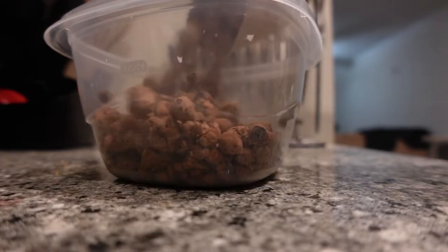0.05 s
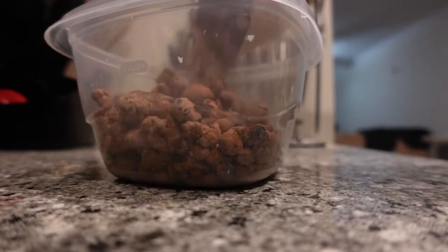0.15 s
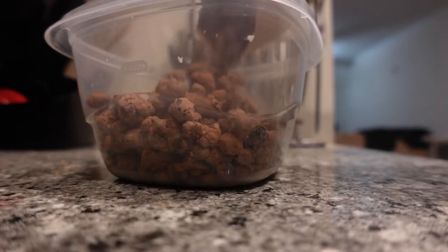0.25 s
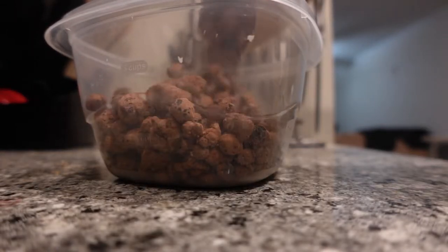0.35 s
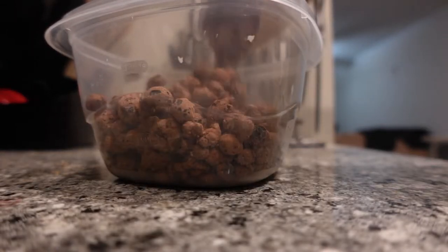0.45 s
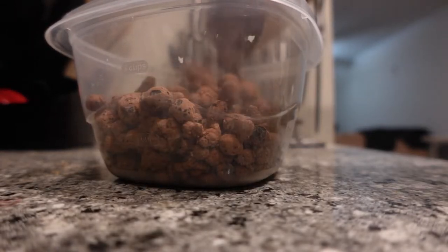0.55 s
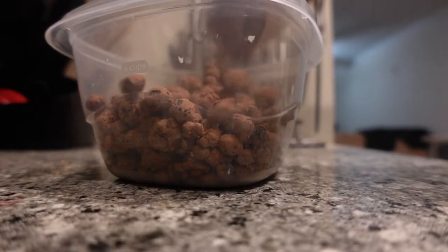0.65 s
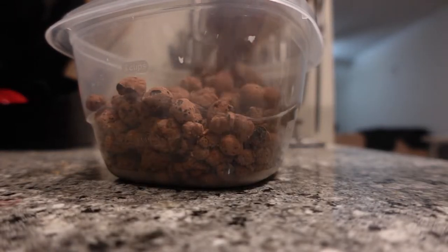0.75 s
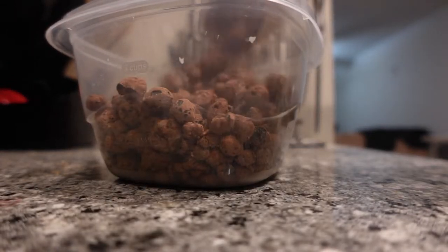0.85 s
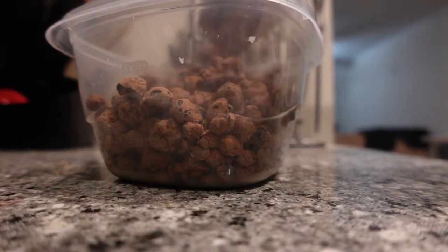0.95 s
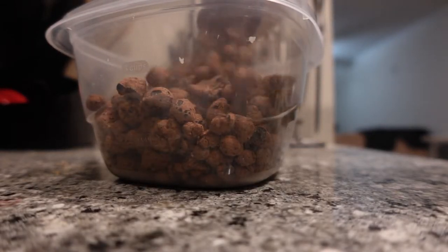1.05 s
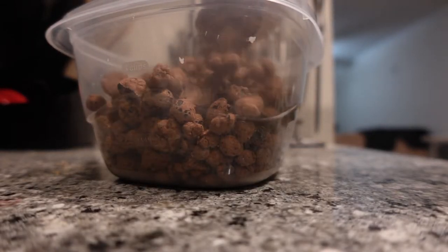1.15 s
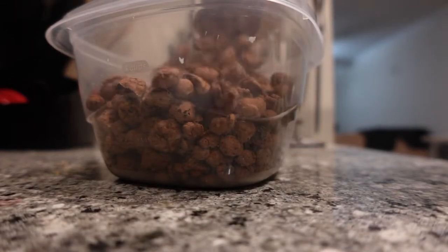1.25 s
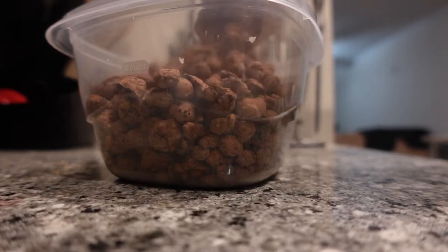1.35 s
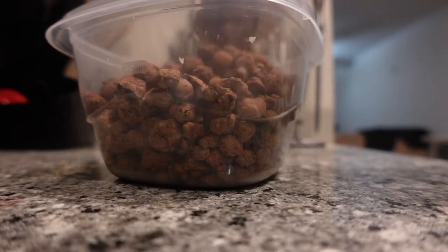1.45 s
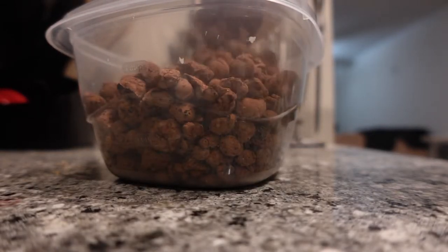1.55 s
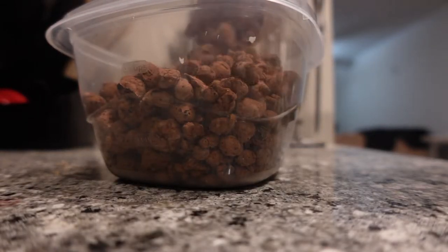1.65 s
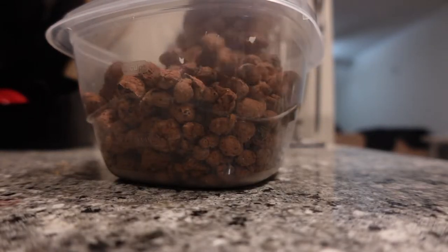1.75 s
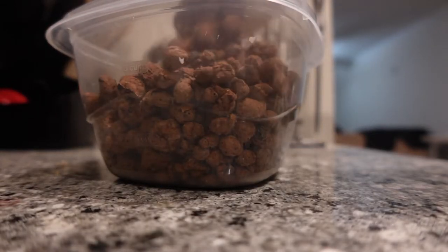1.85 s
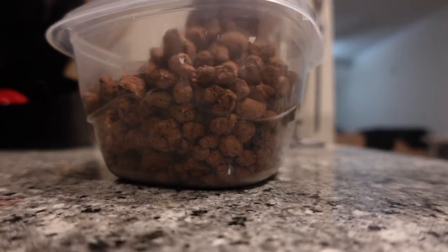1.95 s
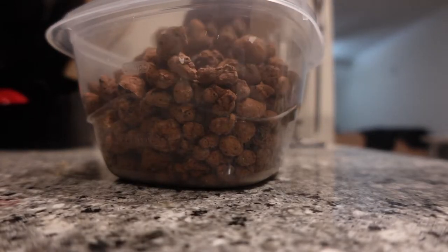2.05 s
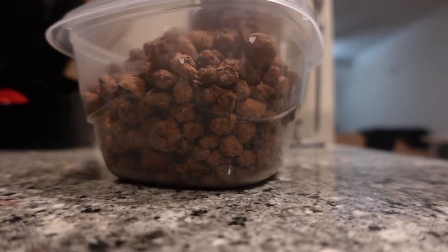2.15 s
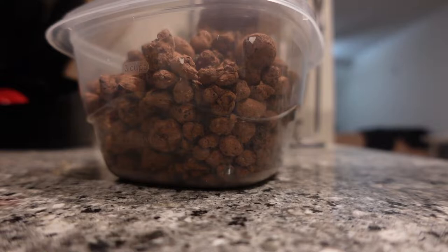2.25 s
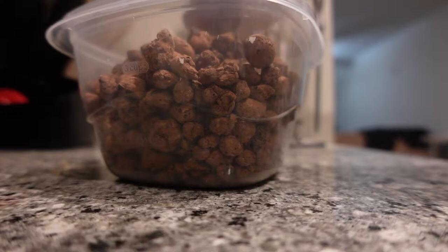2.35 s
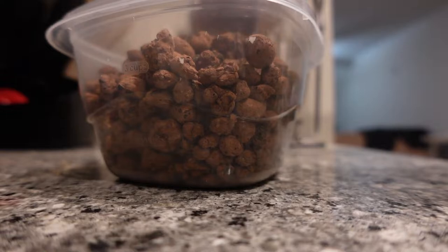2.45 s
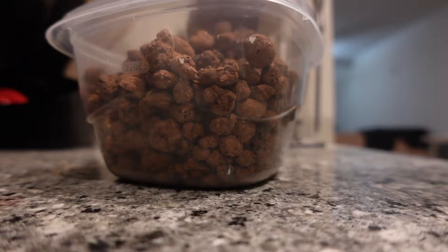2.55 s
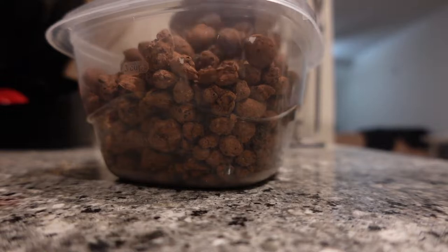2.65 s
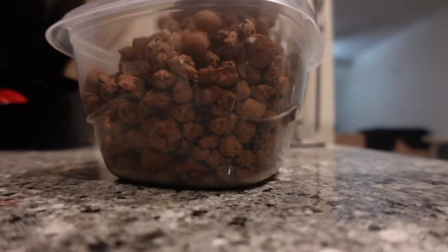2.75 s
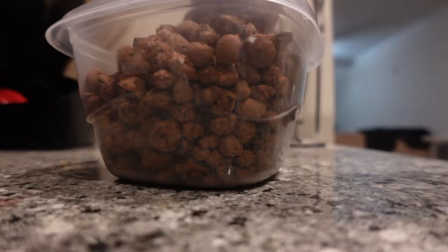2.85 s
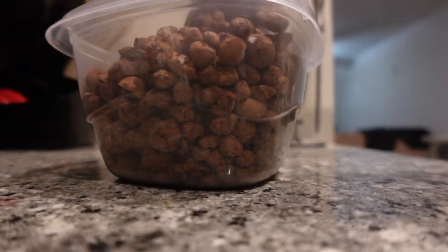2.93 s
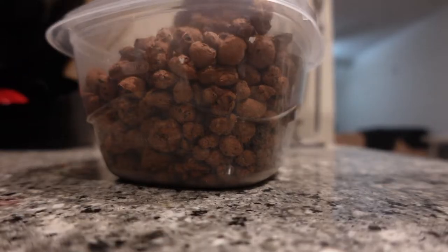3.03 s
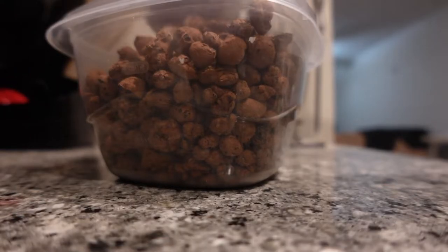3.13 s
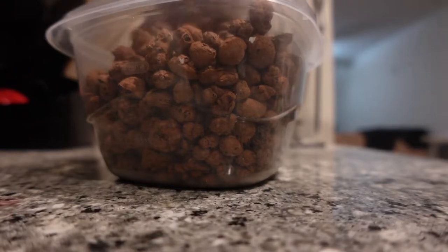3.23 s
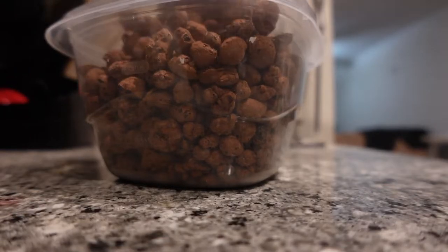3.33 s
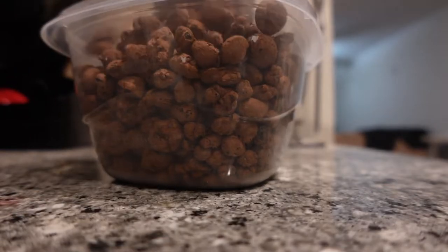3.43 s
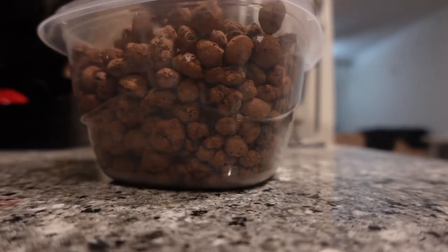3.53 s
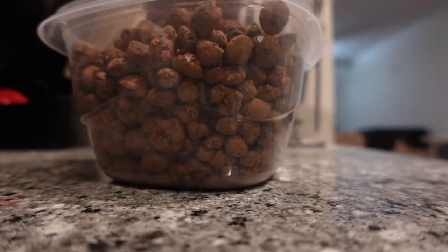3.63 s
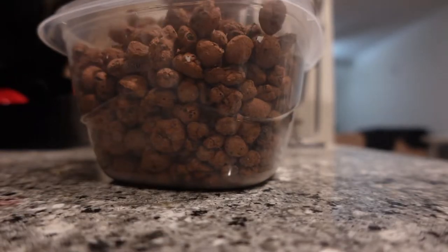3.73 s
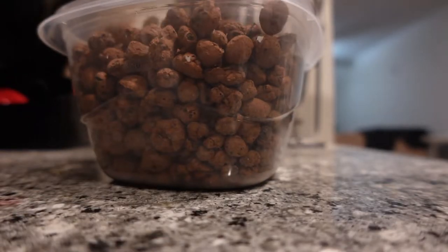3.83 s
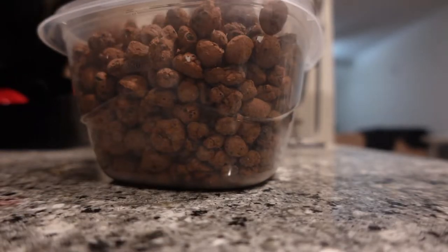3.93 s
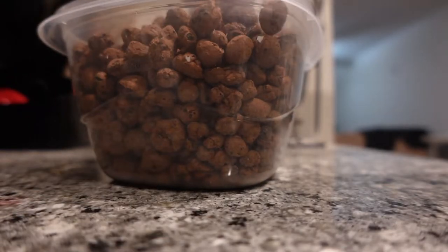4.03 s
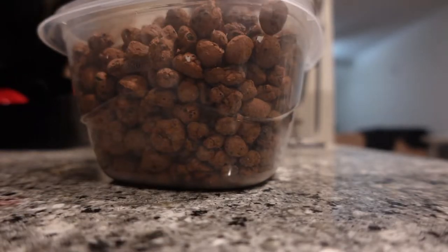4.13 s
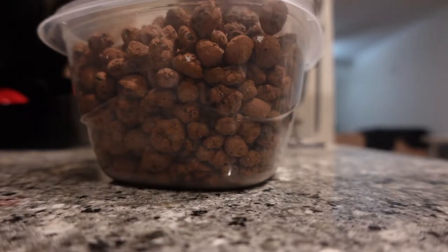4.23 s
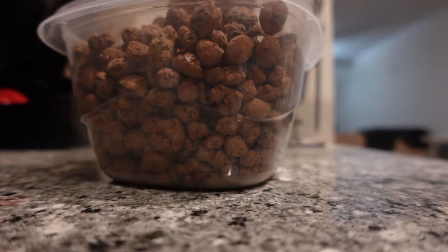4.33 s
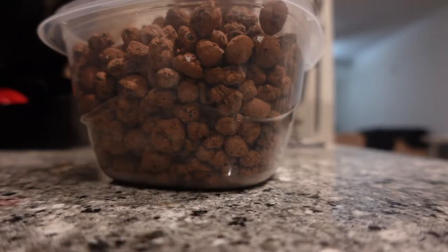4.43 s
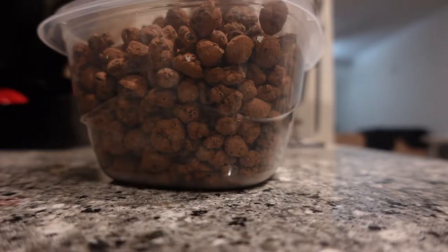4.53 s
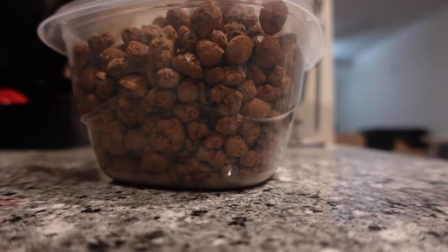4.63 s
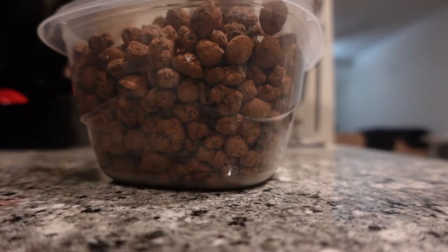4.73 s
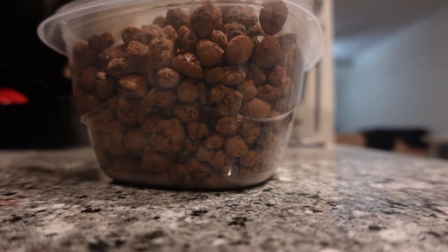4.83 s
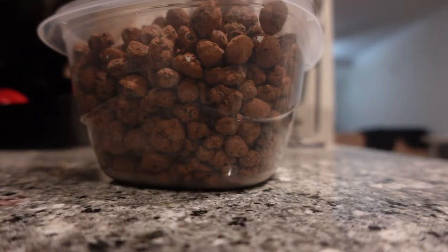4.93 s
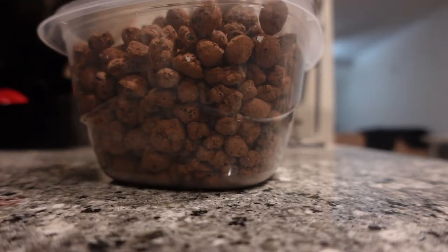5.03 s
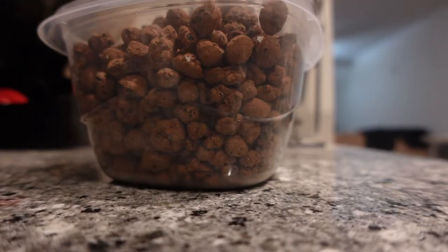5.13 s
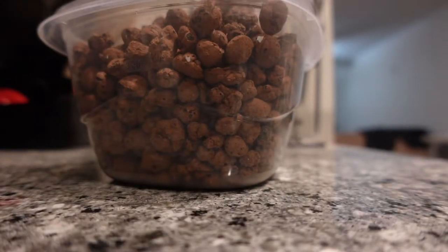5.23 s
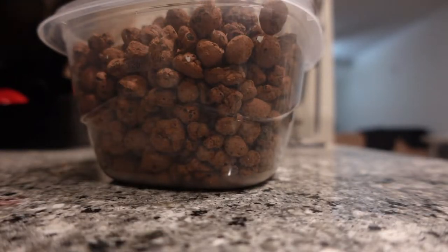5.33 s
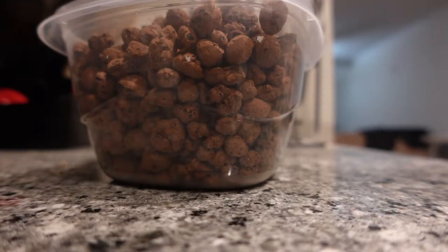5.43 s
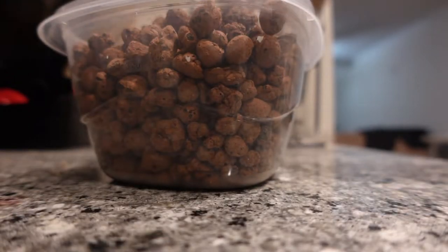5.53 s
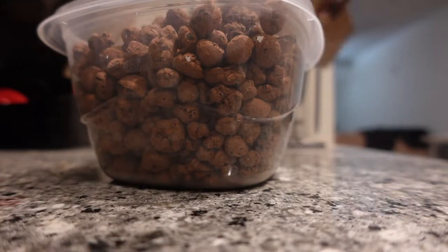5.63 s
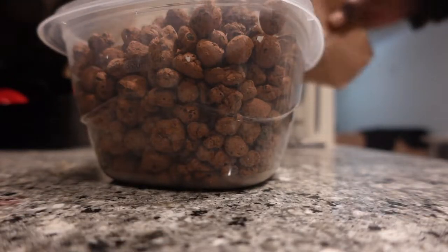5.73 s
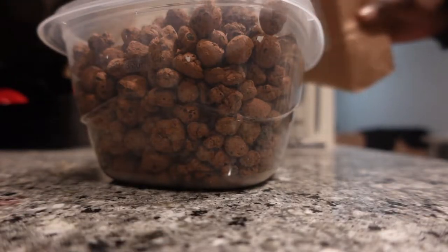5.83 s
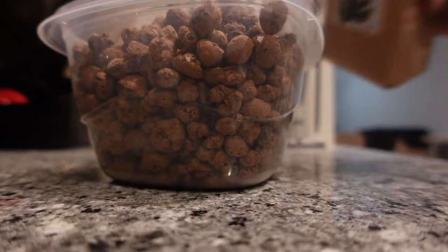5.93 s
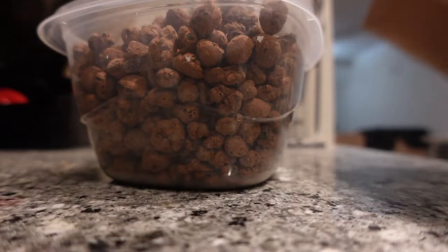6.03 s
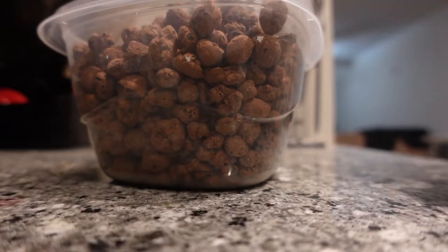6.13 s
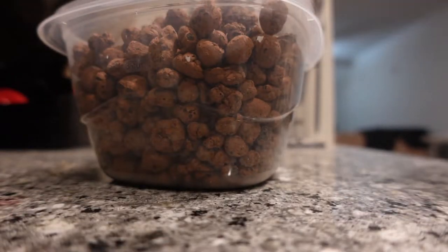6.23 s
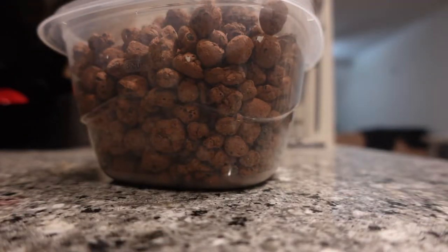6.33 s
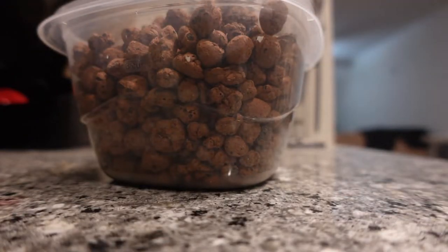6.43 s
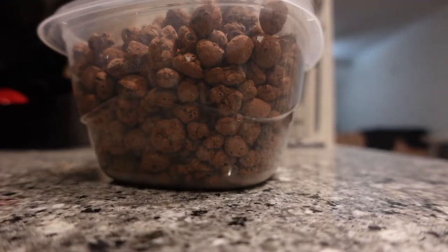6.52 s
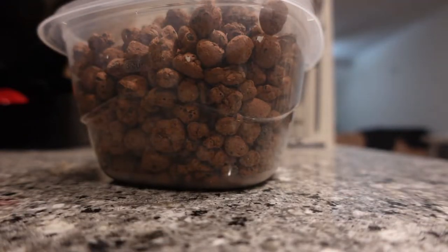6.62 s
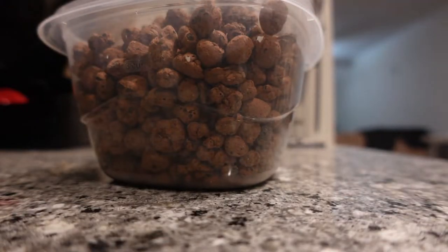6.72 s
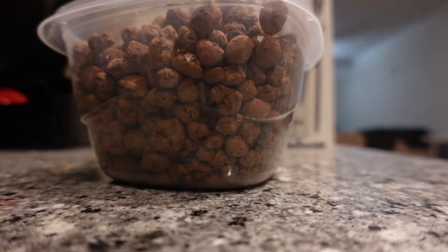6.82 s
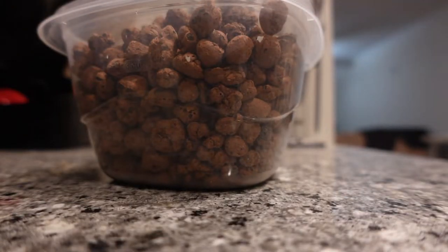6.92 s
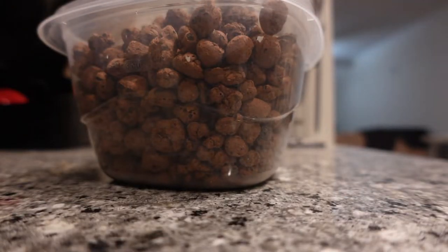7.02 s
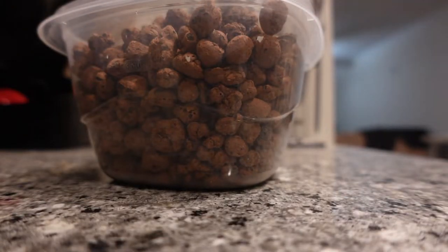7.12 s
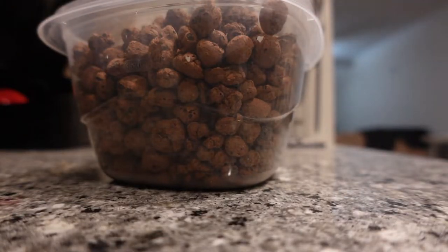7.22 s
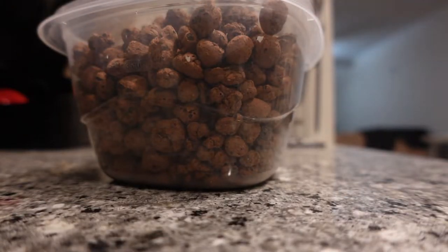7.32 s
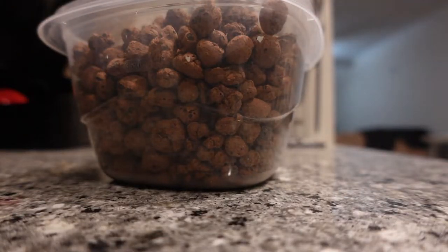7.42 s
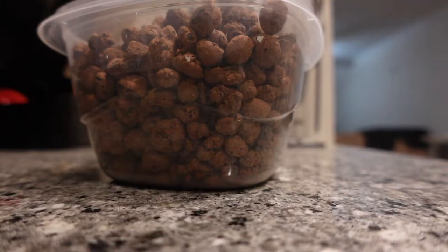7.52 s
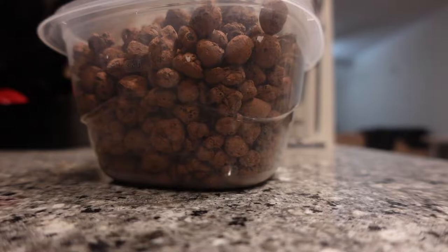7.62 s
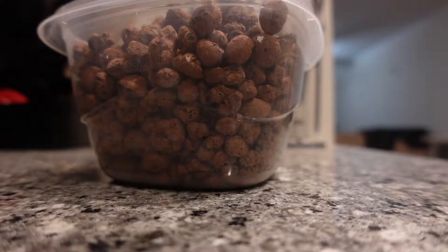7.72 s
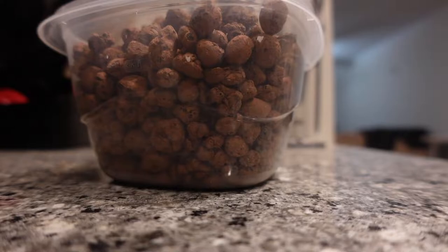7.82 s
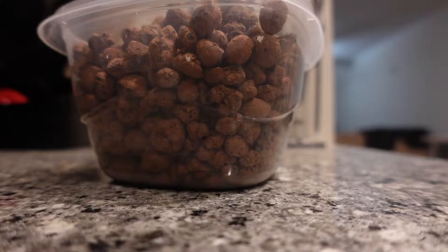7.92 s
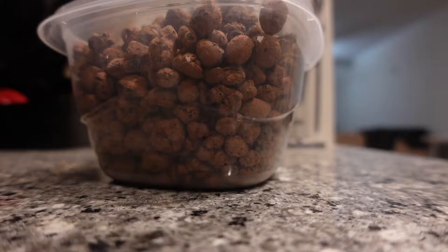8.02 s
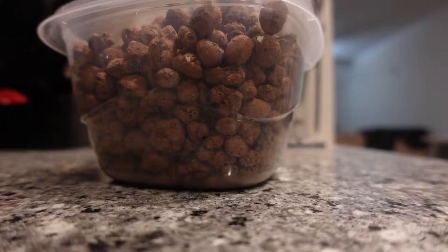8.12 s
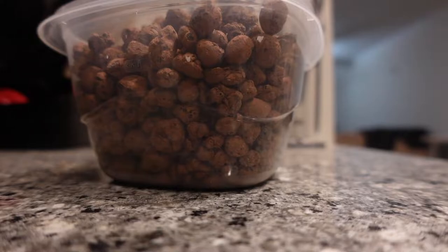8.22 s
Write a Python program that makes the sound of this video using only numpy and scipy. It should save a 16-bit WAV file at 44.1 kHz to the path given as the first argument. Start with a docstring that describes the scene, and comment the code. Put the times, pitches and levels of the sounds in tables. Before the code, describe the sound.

A dense, gritty clatter of pebbles fills a hollow plastic tub, ending in shaken batches, followed by quiet crinkling, a tick and a soft bump.

```python
"""Clay pebbles pour from a bag into a plastic bowl: thousands of dry clicks, each a burst of filtered noise.
The same random blows ring the bowl's modes, which sink as it fills; a random few thud through the heap.
Shakes of the bag send down the last batches, and the stream thins to single clacks by 4.5 s.
Then the bag rustles, snaps and squeaks amid bursts of a thin whir, with faint bumps on the counter.
Dry ticks and a soft bump end it; noise with a few fuzzy tones hums throughout."""
import sys
import numpy as np
from scipy import signal
from scipy.fft import rfft, irfft, next_fast_len
from scipy.io import wavfile
from scipy.ndimage import uniform_filter1d

SR = 44100
rng = np.random.default_rng(int(sys.argv[2]) if len(sys.argv) > 2 else 0)


def digitize_waveform(pressure):
    """Quantize a signal to 16-bit integers and store it at the path in sys.argv[1].

    Rows of a 2-D input are taken as channels; values are limited to [-1, 1].
    """
    field = np.atleast_2d(pressure).T
    bounded = np.clip(field, -1, 1)
    quanta = np.round(bounded * 32767).astype(np.int16)
    wavfile.write(sys.argv[1], SR, quanta)


N = 364707
TIME = np.arange(N) / SR
SHORT = TIME[:4096]  # time axis of one short event

FULL_DB = -18  # clicks at full stream
WALL_DB, WALL_FOLLOW = -21, 0.89  # bowl ring at full stream; dB per dB of flow
HEAP_DB, HEAP_FOLLOW = -41, 1.05  # same for heap thuds
EMPTY_S = 1.1  # time in which the heap covers the bare bowl
EMPTY_WALL_DB, EMPTY_TOCK_DB, EMPTY_BRIGHT_DB = 1.5, 3, -1  # until then: more ring and knock, less hiss
SHAKE_BRIGHT_DB, SHAKE_WALL_DB = 1.1, -0.5  # shaken batches slide, not fall: more hiss, less ring
# clumps dropping heavily on the heap, as swells of the thuds: middle t/s, length/s, level/dB
CLUMP_DROPS = [(.35, .07, -33), (.69, .07, -37.5), (.81, .05, -38), (1.07, .07, -33), (2.35, .06, -33.5),
               (3.3, .08, -34), (3.47, .15, -42)]


def stream():
    """Blows of one random train make clicks, ring the bowl and, for a random few, thud through the heap."""
    flow_db, shaken = flow()
    empty = np.exp(-(TIME / EMPTY_S) ** 2)
    per_s = np.interp(TIME, [0, 2.9, 3.5, 4.3], [3200, 2800, 2200, 1500])
    bunching = unit(uniform_filter1d(rng.standard_normal(N), 400))  # pebbles arrive in bunches
    blows = impacts(per_s * amp(2.5 * bunching), spread_db=1.0, cap=4.2)
    tocks, jolts = knocks()
    clicks = steady(clay_contacts(blows), 0.27) + amp(-8.5 + EMPTY_TOCK_DB * empty) * tocks
    clicks = brighten(clicks, flow_db, shaken, empty)
    wall = steady(bowl(unit(blows) + amp(-3.5) * jolts, TIME), .1)
    thuds = steady(heap_thuds(blows), .1)
    wall_db = WALL_DB + WALL_FOLLOW * flow_db + EMPTY_WALL_DB * empty + SHAKE_WALL_DB * shaken
    heap_gain = power_sum(amp(HEAP_DB + HEAP_FOLLOW * flow_db), swells(CLUMP_DROPS))
    return amp(FULL_DB + flow_db) * clicks + amp(wall_db) * wall + heap_gain * thuds


# flow out of the bag, full at first, then running dry: t/s, level/dB
POUR = [(0, -16.5), (.3, -18), (.6, -18.5), (1.03, -16), (1.22, -17.5), (1.55, -16.5), (1.61, -21.5),
        (1.71, -16.5), (2.15, -15.5), (2.23, -21), (2.95, -22.5), (3.07, -26.5), (3.44, -29), (3.96, -26.5),
        (4.04, -34), (4.14, -37), (4.28, -49.5), (4.43, -57)]
# shakes that send down another batch: middle t/s, length/s, level/dB
BAG_SHAKES = [(2.35, 0.26, -23), (2.55, 0.081, -17.5), (2.66, 0.072, -19.5), (2.78, 0.083, -16.5),
              (2.9, 0.11, -16.5), (3.01, 0.084, -19.5), (3.15, 0.13, -22), (3.29, 0.13, -16),
              (3.535, 0.085, -22.5), (3.68, 0.099, -19), (3.81, 0.11, -28.5), (3.92, 0.062, -26),
              (4.33, .04, -47.5)]


def flow():
    """Stream level in dB relative to full, and the share of its power that is shaken out."""
    pour = amp(np.interp(TIME, *np.transpose(POUR), right=-120))
    shaken = swells(BAG_SHAKES)
    total = power_sum(pour, shaken)
    return 20 * np.log10(total) - FULL_DB, (shaken / total) ** 2


# colour of clay hitting clay: f/Hz, level/dB
CLAY_COLOUR = [(150, -25.5), (500, -7.5), (1100, -0.5), (1700, -3), (2000, 0), (2500, -0.5), (3300, 0),
               (5000, -4), (7000, -5), (10000, -8), (13000, -13), (16000, -20)]


def clay_contacts(blows, count=16):
    """Pebbles of many sizes collide, each size at its pitch; porous skins rub after each contact."""
    size = rng.integers(0, count, N)
    contacts = 0
    for k, hz in enumerate(np.geomspace(1100, 14000, count)):
        contacts = contacts + band(grit(blows * (size == k), t60=0.011), hz, q=1.1)
    scrape = band(grit(blows, t60=.04), 9000, q=0.48)
    return colour(unit(contacts) + amp(-2) * unit(scrape), CLAY_COLOUR)


def knocks(count=28):
    """Larger pebbles strike the heap with a hollow tock, each at its own pitch, and jolt the bowl."""
    blows = impacts(75, spread_db=2.8, cap=1.8)
    size = rng.integers(0, count, N)
    tocks = 0
    for k, hz in enumerate(np.geomspace(1300, 4800, count)):
        tocks = tocks + signal.oaconvolve(blows * (size == k), ping(hz, cycles=2.8)[:1024])[:N]
    return steady(tocks, 0.067), unit(blows)


# treble lift, with an equal cut of the lows: at full stream; dB per dB of flow
BRIGHT_DB, BRIGHT_FOLLOW = 1.5, 0.18
FINES_S, FINES_LENGTH_S, FINES_DB = 3.89, 0.4, 5  # small crumbs from the bag's bottom come last, brighter
BRIGHT_FLICKER_DB = 1.0  # rms; the mix of large and small pebbles keeps changing


def brighten(clicks, flow_db, shaken, empty):
    """Tilts the clicks about 5 kHz: dense flow and small crumbs are brighter than a few pebbles."""
    dull = signal.lfilter(*signal.butter(1, 5000, fs=SR), clicks)
    bright_db = BRIGHT_DB + BRIGHT_FOLLOW * flow_db + FINES_DB * bell(TIME, FINES_S, FINES_LENGTH_S)
    bright_db = bright_db + SHAKE_BRIGHT_DB * shaken + EMPTY_BRIGHT_DB * empty
    bright = amp(bright_db + BRIGHT_FLICKER_DB * wander(size=1400))
    return dull / np.maximum(bright, .1) + (clicks - dull) * bright


# bowl modes: nominal f/Hz, width/Hz of the first of two resonators, level/dB at start, level/dB when full
BOWL_MODES = [(330, 87, -16, -19), (427, 63, -11.5, -13), (537.4, 70, -12, -5.5), (566, 130, -13, -9.5),
              (750.5, 81, -2, 0), (879, 101, -1, -0.5), (1216, 170, -4, -4.5), (1400, 130, -8, -7),
              (1632, 210, -8, -6)]


def bowl(blows, s):
    """Each blow lands elsewhere on the wall and favours other modes; the load of pebbles lowers them."""
    full = np.clip(s / 3.06, 0, 1)
    sag = 1.04 - 0.06 * full
    ring = 0
    for hz, width, start_db, full_db in BOWL_MODES:
        mode_gain = amp(start_db + (full_db - start_db) * full)
        drive = blows * rng.standard_normal(len(blows)) * mode_gain
        ring = ring + resonate(resonate(drive, hz * sag, width), hz * sag, 5.0 * width)
    return ring


# colour of a thud through the heap: f/Hz, level/dB
THUD_COLOUR = [(25, -17), (50, -31), (75, -12.5), (110, -4.5), (185, 3.5), (270, 1.5), (380, -1.5),
               (600, -11), (1500, -55.5)]


def heap_thuds(blows):
    """A random 12 % of the blows thud through the heap, whose resonance deepens as it grows."""
    thudding = blows * (rng.random(N) < .12)
    heap_hz = np.interp(TIME, [0, 1.2, 2.3, 4], [180, 178, 113, 102])
    heap = resonate(resonate(thudding, heap_hz, 70), heap_hz, 110)
    return unit(colour(thudding, THUD_COLOUR)) + amp(-9.0) * unit(heap)


# hard landings: t/s, level/dB before a 2 dB cut, f/Hz,
# bowl share/dB (high on the wall, low on the heap)
HARD_LANDINGS = [(.502, -0.5, 1372, -15), (0.534, -2.5, 1400, -14), (0.557, 0.5, 2870, -19.5),
                 (.58, -2, 1400, -15.5), (0.642, -1, 1685, -9), (.797, 1.5, 1594, -10),
                 (2.237, -10.5, 1500, -21), (2.253, 2, 3390, -12.5), (2.279, -11, 1360, -5.5),
                 (2.31, -1.5, 1540, -20), (2.362, -2.5, 2050, -14), (2.468, 0.5, 3270, -15),
                 (3.368, 1.5, 3240, -14), (3.4122, -2, 2000, -12), (3.465, -3, 1910, -13.5),
                 (3.521, 3.5, 2400, -17), (3.614, -5, 3520, -9.5), (3.782, 0.5, 7040, -15),
                 (3.863, 3.5, 3400, -27), (3.912, -6.5, 3000, -10), (3.933, -4, 1990, -20),
                 (3.958, 2, 3300, -8), (4.008, -7, 1710, -7.5), (4.067, 0.5, 2800, -11.5),
                 (4.107, -7, 2200, -19), (4.113, -10, 3460, -6), (4.154, -8, 3600, -10),
                 (4.192, -13, 2840, -12.5), (4.2319, -7, 6000, -16.5), (4.32, -14.5, 4000, -4),
                 (4.357, -21.5, 1810, -5), (4.445, -0.5, 2300, -14)]


def clacks():
    """A hard landing: a tock with its gritty crack, the jostle of its neighbours and the bowl's ring."""
    out = np.zeros(N)
    for s, db, hz, bowl_db in HARD_LANDINGS:
        tock = amp(-2.5) * ping(hz, cycles=0.36)
        crack = amp(-4.5) * peaked(click(np.sqrt(hz * 3600), t60=0.017, q=1.0))
        jostle = amp(-15.5) * peaked(click(hz, t60=.06, q=1.0))
        wall = amp(bowl_db) * peaked(bowl(signal.unit_impulse(len(SHORT)), s))
        add(out, s, amp(db - 2.0) * (tock + crack + jostle + wall))
    return signal.lfilter(*signal.butter(3, 450, "high", fs=SR), out)


# bag crackle colour: f/Hz, level/dB
BAG_COLOUR = [(100, 0.5), (450, 12), (850, -1), (1200, 8), (1800, 1), (3200, 3), (6000, 1), (10000, -6.5),
              (15000, -12.5)]
# bag sliding and being lifted away: middle t/s, length/s, level/dB
BAG_STROKES = [(4.47, 0.33, -50), (5.27, 0.1, -56), (5.46, 0.13, -54), (5.75, 0.13, -55.5),
               (5.9, 0.093, -51), (6.02, 0.11, -52.5), (6.48, 0.053, -58), (6.73, 0.036, -50),
               (6.79, 0.063, -43), (6.91, 0.086, -49), (7.38, .05, -61)]
CREEP_DB = -64  # rustle between strokes
# creases snapping: t/s, level/dB before a 6 dB cut, f/Hz, share of the dull flap/dB
BAG_CREASES = [(5.189, -26, 6360, -21), (5.4, -21, 2530, -16), (5.413, -28, 6100, -16),
               (5.429, -21, 4500, -7), (5.786, -25, 6690, -1), (5.986, -25, 3970, -5),
               (5.99, -25, 2780, -18), (6.008, -31.5, 3920, -11), (6.71, -36, 1900, -10),
               (6.783, -27.5, 2150, 2.5), (6.798, -21, 4660, -14), (6.983, -41, 1940, -14)]
# short squeaks: t/s, level/dB, f/Hz, t60/s
BAG_SQUEAKS = [(4.579, -46, 3800, 0.48), (4.576, -43.5, 6100, 0.32), (4.845, -50, 4840, .12),
               (5.283, -49, 3200, 0.092), (6.712, -45.5, 1225, 0.82), (7.372, -51, 2450, .2)]


def bag():
    """Clumped crackle as the film sticks and slips, creases that snap and flap, and short squeaks."""
    catching = unit(uniform_filter1d(rng.standard_normal(N), 300))
    slips = impacts(1500 * amp(5 * catching), spread_db=3.2, cap=3)
    crackle = colour(grit(slips, t60=0.0045), BAG_COLOUR)
    out = power_sum(swells(BAG_STROKES), amp(CREEP_DB) * carried()) * steady(crackle, 0.094)
    for s, db, hz, flap_db in BAG_CREASES:
        snap = peaked(click(hz, t60=0.034, q=1.0))
        flap = amp(flap_db) * peaked(click(770, t60=0.049, q=2.7))
        add(out, s, amp(db - 6.0) * (snap + flap))
    t = TIME[:SR // 3]
    for s, db, hz, t60 in BAG_SQUEAKS:
        rub = rng.standard_normal(len(t))
        squeak = unit(resonate(resonate(rub, hz, 0.14 * hz), hz, .25 * hz))
        add(out, s, squeak * amp(db - 60 * t / t60) * (1 - np.exp(-t / 0.0044)))
    return out


HELD_S = 4.3
LET_GO_S, LET_GO_DB_PER_S = 6.9, 110  # until let go, the bag never falls quite still


def carried():
    """Gain 1 while the bag is moved, fading once it is let go."""
    return (TIME > HELD_S) * amp(-LET_GO_DB_PER_S * np.maximum(TIME - LET_GO_S, 0))


# whir resonances: f/Hz, base width/Hz (two resonators, x1.8 and x6), level/dB
WHIR_RESONANCES = [(6100, 220, -6.5), (6680, 220, 2.5), (9230, 190, -1), (10370, 60, -1.5),
                   (11200, 140, -11), (14500, 250, -15)]
# whir bursts: start t/s, level/dB, t60/s
WHIR_BURSTS = [(4.305, -32.5, 0.28), (4.4, -42.5, 0.81), (4.7, -50.5, 1), (4.79, -52, 0.46),
               (4.95, -57, .7), (5.18, -56, 1.5), (5.44, -43, 0.49), (5.702, -42.5, 0.39),
               (6.568, -47, 0.43)]
WHIR_IDLE_DB, WHIR_RISE_S, WHIR_WAVER_DB = -68, 0.0046, 2  # waver is rms


def whir():
    """Fine friction in a few high resonances, in wavering bursts over a faint idle."""
    rub = rng.standard_normal(N)
    gain = amp(WHIR_IDLE_DB) * carried()
    for s, db, t60 in WHIR_BURSTS:
        age = np.maximum(TIME - s, 0)
        burst = amp(db) * (1 - np.exp(-age / WHIR_RISE_S)) * np.exp(-np.log(1000) * age / t60)
        gain = power_sum(gain, burst)
    tone = 0
    for hz, width, db in WHIR_RESONANCES:
        tone = tone + amp(db) * resonate(resonate(rub, hz, 1.8 * width), hz, 6 * width)
    return gain * amp(WHIR_WAVER_DB * wander(size=1200)) * unit(tone)


# small dry ticks: t/s, level/dB before a 1.5 dB cut, f/Hz
DRY_TICKS = [(7.5826, -41, 2890), (7.8494, -16, 2890), (8.0166, -22, 2850), (8.0298, -31.5, 2590)]


def ticks():
    """Short dry knocks: a quick ring, two fixed pings and a gritty click."""
    out = np.zeros(N)
    for s, db, hz in DRY_TICKS:
        ring = peaked(np.sin(2 * np.pi * hz * SHORT) * SHORT * np.exp(-SHORT / 0.00051))
        pings = amp(-18.5) * ping(1320, cycles=4.5) + amp(-11.5) * ping(5100, cycles=5.7)
        crack = amp(-14.5) * peaked(click(2860, t60=0.034, q=4.8))
        add(out, s, amp(db - 1.5) * (ring + pings + crack))
    return out


# soft bumps on the counter: t/s, peak level/dB
COUNTER_BUMPS = [(5.786, -40), (5.985, -34), (8.14, -22.5), (8.148, -28), (8.158, -27)]
# counter modes: f/Hz, level/dB, t60/s
COUNTER_MODES = [(124, 1.5, 0.065), (268.5, 9.5, 0.038), (410, 6, 0.024), (520, 6, .028), (720, -14, 0.05),
                 (1010, -13, 0.053)]


def bumps():
    """Dull bumps that ring the low modes of the counter."""
    thump = 0
    for hz, db, t60 in COUNTER_MODES:
        thump = thump + amp(db - 60 * SHORT / t60) * np.sin(2 * np.pi * hz * SHORT)
    thump = signal.lfilter(*signal.butter(4, 90, "high", fs=SR), thump)
    out = np.zeros(N)
    for s, db in COUNTER_BUMPS:
        add(out, s, amp(db) * peaked(thump))
    return out


# room decay: f/Hz, t60/s
ROOM_DECAY = [(200, 0.12), (1000, 0.19), (3000, 0.17), (8000, 0.043), (16000, 0.27)]


def room(x, count=4):
    """Diffuse noise tails, each band dying at its own speed; the sound feeds different tails in turn."""
    out = np.zeros(N)
    for k in range(count):
        hz, t, z = signal.stft(rng.standard_normal(SR // 3), SR, nperseg=256)
        tail = signal.istft(z * amp(-60 * t / read(ROOM_DECAY, hz)[:, None]), SR, nperseg=256)[1]
        tail *= np.arange(len(tail)) > .006 * SR  # 6 ms gap
        turn = np.maximum(np.cos(2 * np.pi * (3 * TIME + k / count)), 0)  # 3 rounds/s
        out += signal.oaconvolve(x * turn, tail / np.linalg.norm(tail))[:N]
    return out


# air noise colour: f/Hz, relative density/dB
AIR_COLOUR = [(25, -26.5), (50, -33.5), (105, -6.5), (170, -5), (330, -1), (450, -4), (530, -5.5),
              (770, -7.5), (880, -13.5), (1900, -20.5), (2400, -17.5), (3100, -19.5), (3500, -24.5),
              (16000, -39)]
# fuzzy tones: f/Hz, width/Hz of the first resonator (x3 for the second), level/dB
HUM_TONES = [(123, 20, -66.5), (259, 37, -56.5), (1312, 60, -66)]
HUM_DB = -52.5  # rms of the air noise


def hum():
    """Steady air noise of the room with a few fuzzy tones."""
    out = amp(HUM_DB) * unit(colour(rng.standard_normal(N), AIR_COLOUR))
    for hz, width, db in HUM_TONES:
        tone = resonate(resonate(rng.standard_normal(N), hz, width), hz, 3 * width)
        out = out + amp(db) * unit(tone)
    return out


# left lead: f/Hz, phase/rad
LEFT_LEAD = [(50, .01), (250, .18), (650, .15), (900, .34), (1400, .03), (2000, 0)]
# left over right: f/Hz, level/dB
LEFT_TILT = [(50, .2), (200, 1.1), (600, .4), (770, -1.8), (950, -.5), (2000, 0)]


def ports(x):
    """Left and right of a near source: a small shift of phase and level in the lows."""
    size = next_fast_len(N + len(SHORT))
    hz = np.fft.rfftfreq(size, 1 / SR)
    half = np.exp(.5j * read(LEFT_LEAD, hz)) * amp(read(LEFT_TILT, hz) / 2)
    return irfft(rfft(x, size) * np.array([half, 1 / half]), size)[:, :N]


def click(hz, t60, q):
    """One gritty contact: a dying noise burst, ringing broadly around hz."""
    return band(rng.standard_normal(len(SHORT)) * amp(-60 * SHORT / t60), hz, q)


def ping(hz, cycles):
    """A knock that swells at once and rings a few cycles; a small body radiates no bass."""
    turns = min(hz, SR / 3) * SHORT
    ring = np.sin(2 * np.pi * turns) * (1 - np.exp(-4 * turns)) * np.exp(-turns / cycles)
    return peaked(signal.lfilter(*signal.butter(2, 450, "high", fs=SR), ring))


def impacts(per_s, spread_db, cap):
    """Random blows at the given rate, many small and a few large."""
    size = amp(spread_db * np.minimum(rng.exponential(1, N), cap))
    return size * rng.choice([-1, 1], N) * (rng.random(N) < per_s / SR)


def grit(blows, t60):
    """Every blow sets off its own short burst of crumbling contact."""
    keep = np.exp(-2 * np.log(1000) / (t60 * SR))  # power decay per sample
    power = signal.lfilter([1], [1, -keep], blows ** 2 + 1e-18)
    return np.sqrt(power) * rng.standard_normal(N)


def band(x, hz, q):
    """A broad resonance with gentle skirts."""
    hz = min(hz, SR / 3)
    return signal.lfilter(*signal.iirpeak(hz, max(q, 2.5 * hz / SR), SR), x)


def resonate(x, hz, width):
    """A resonance whose pitch may move, normalised to about gain 1."""
    r = np.exp(-np.pi * width / SR)
    if np.ndim(hz) == 0:
        pull = r * np.cos(2 * np.pi * hz / SR)
        return 2 * (1 - r) * signal.lfilter([1, -pull], [1, -2 * pull, r * r], x + 1e-18)
    # moving pitch: shift to 0 Hz, smooth, shift back
    turn = np.exp(2j * np.pi * (np.cumsum(hz / SR) % 1))
    return 2 * (turn * signal.lfilter([1 - r], [1, -r], x * turn.conj() + 1e-18)).real


def colour(x, points):
    """Causal minimum-phase filter with the given spectrum."""
    log_gain = np.log(amp(read(points, abs(np.fft.fftfreq(len(SHORT), 1 / SR)))))
    taps = np.fft.ifft(np.exp(np.conj(signal.hilbert(log_gain)))).real
    return signal.oaconvolve(x, taps[:len(taps) // 2])[:len(x)]


def steady(x, seconds):
    """Keeps the fast grain of x and evens out its slow level."""
    size = max(int(seconds * SR), 1)
    power = uniform_filter1d(uniform_filter1d(x ** 2, size), size)
    return x / np.sqrt(abs(power) + 1e-12)


def bell(t, s, length):
    """A smooth rise and fall around s seconds."""
    return np.exp(-2 * ((t - s) / length) ** 2)


def swells(rows):
    """Gain over time of bell-shaped pushes: middle t/s, length/s, level/dB."""
    t = TIME[::64]
    return np.interp(TIME, t, power_sum(*(amp(db) * bell(t, s, length) for s, length, db in rows)))


def wander(size):
    """Slow chance of rms 1, smoothed over size samples."""
    return unit(uniform_filter1d(uniform_filter1d(rng.standard_normal(N), size), size))


def power_sum(*gains):
    """Joint gain of unrelated sounds."""
    return np.sqrt(sum(gain ** 2 for gain in gains))


def add(mix, s, sound):
    """Mixes a sound in at s seconds."""
    part = mix[max(round(s * SR), 0):][:len(sound)]
    part += sound[:len(part)]


def read(points, hz):
    """A spectrum table on a log-frequency axis."""
    f, value = np.transpose(points)
    return np.interp(np.log(hz + 1), np.log(f + 1), value)


def amp(db):
    """Decibels to gain."""
    return np.exp(np.asarray(db) * (np.log(10) / 20))


def unit(x):
    """Scales to rms 1."""
    return x / np.sqrt(np.mean(x ** 2) + 1e-20)


def peaked(x):
    """Scales to peak 1."""
    return x / (abs(x).max() + 1e-20)


# colour of the faint left-right difference while pebbles sound: f/Hz, level/dB
SIDE_COLOUR = [(40, -18), (100, -23), (250, -26), (600, -23), (1050, -16.5), (2000, -27), (4500, -37),
               (8500, -28), (12000, -37), (16000, -40)]


def scene():
    """The near sounds are almost mono; a faint left-right difference follows pebbles, bag and hum."""
    pebbles = stream() + clacks()
    pebbles = signal.lfilter(*signal.butter(3, 72, "high", fs=SR), pebbles)  # a light bowl has no deep bass
    rustle = bag() + whir()
    near = pebbles + amp(-10.5) * room(pebbles) + rustle + amp(-11) * room(rustle) + ticks() + bumps()
    side = colour(room(pebbles), SIDE_COLOUR) + amp(-6.0) * room(rustle) + amp(-9) * hum()
    return ports(near) + hum() + np.array([side, -side])


EDGE_HZ = 15950


def record(dry):
    """Rounds off the loudest peaks below 0.9, then limits the band."""
    rounded = dry / (1 + (dry / .9) ** 4) ** .25
    lowpass = signal.firwin(511, EDGE_HZ, window=("kaiser", 9), fs=SR)
    return signal.oaconvolve(rounded, lowpass[None], "same")


dry = scene()
out = record(dry)
digitize_waveform(out)
```